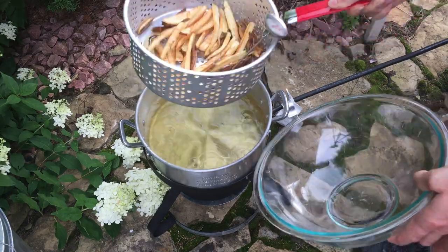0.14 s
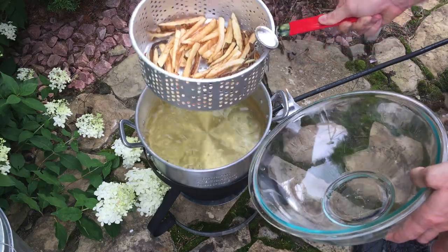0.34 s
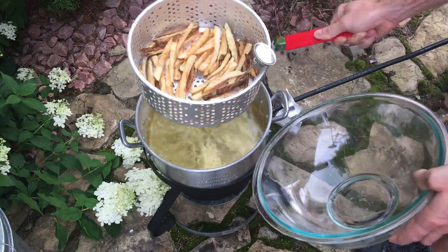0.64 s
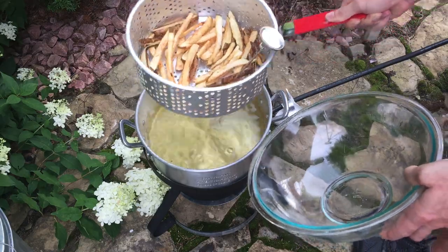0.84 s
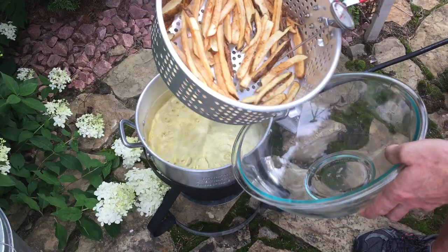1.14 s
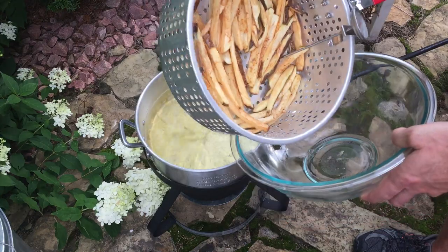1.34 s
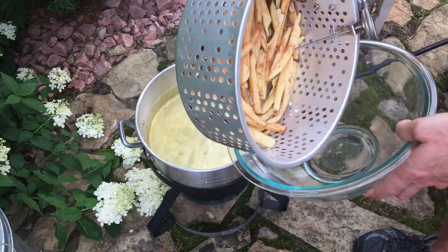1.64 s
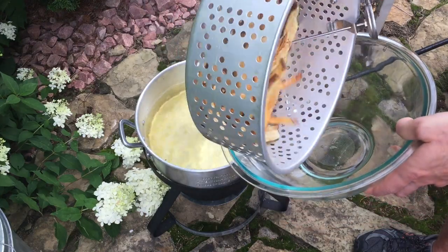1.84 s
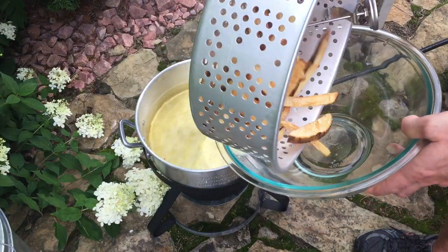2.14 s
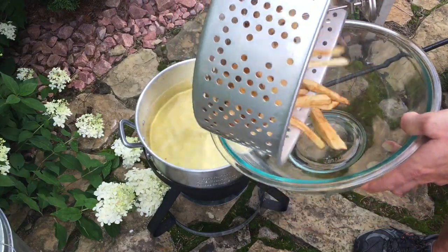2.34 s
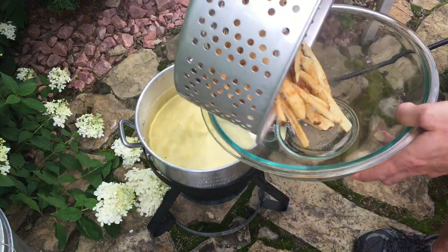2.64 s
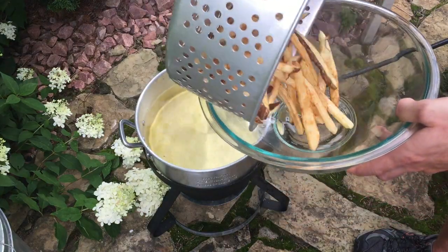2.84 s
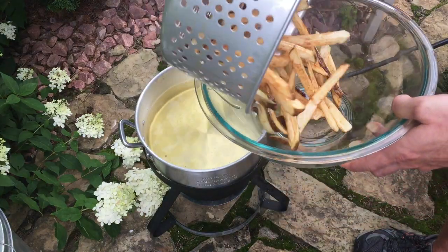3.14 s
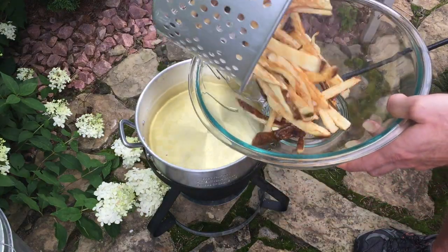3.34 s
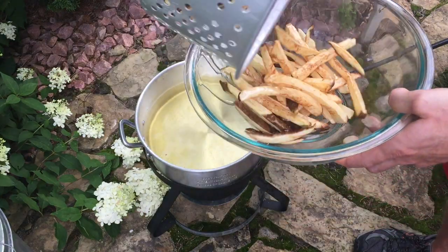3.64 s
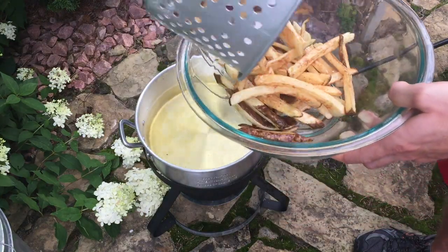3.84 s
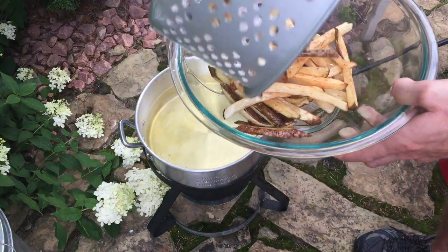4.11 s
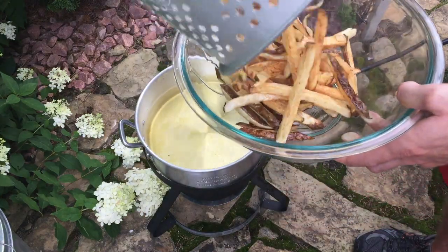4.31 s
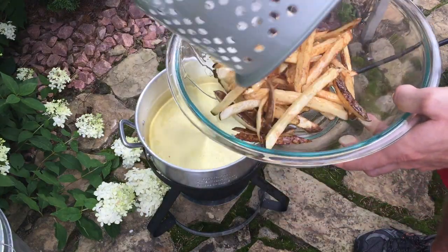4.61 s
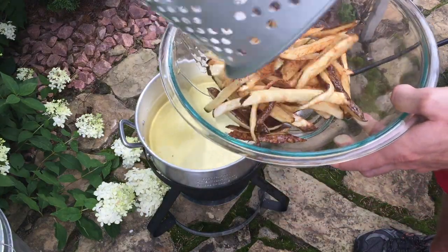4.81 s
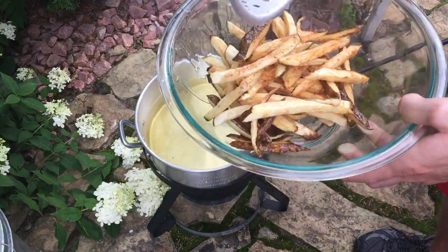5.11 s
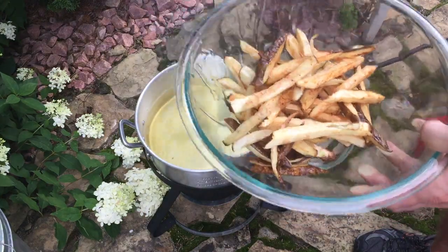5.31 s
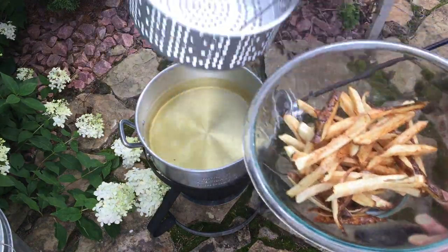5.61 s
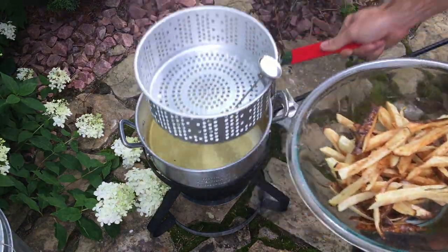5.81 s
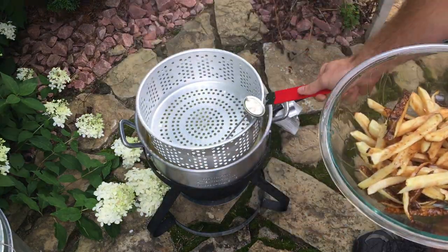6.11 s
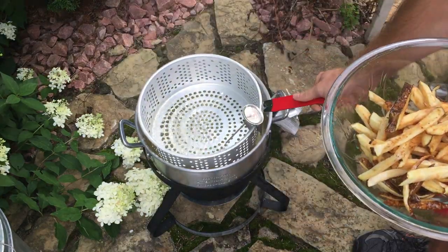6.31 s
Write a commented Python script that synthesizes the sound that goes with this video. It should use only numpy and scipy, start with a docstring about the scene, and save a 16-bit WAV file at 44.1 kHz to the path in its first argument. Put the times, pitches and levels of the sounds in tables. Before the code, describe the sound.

The sounds are close, in a quiet garden with soft air, a low hum and very faint ticks of hot oil. In the first second a metal fryer basket scrapes and bumps lightly and its clip clinks. From about 1.1 to 1.7 seconds the basket knocks repeatedly on a glass bowl, which rings; these are the loudest sounds. Softer knocks follow between 2.2 and 2.5 seconds. From about 1.4 to 4.7 seconds crisp fries rustle over the metal and tumble into the bowl in surges, with dull taps, soft thumps and small clinks. A distant bird whistles faintly near 0.6, 4.4 and 4.9 seconds. A far dog yaps faintly near 1.5 seconds and more clearly at 5.3. At 5.9 seconds the empty basket lands in its pot with a ringing clank, followed by light scrapes and bumps. Everything is heard on the left side only.

```python
"""In a garden, close to the microphone, hot oil ticks and a thermometer clip rattles on an aluminium basket.
A bird whistles far off. From about 1 s the basket knocks on a hand-held glass bowl, which rings, and crisp
fries rustle over the perforated wall and tumble in. A distant dog yaps as they pour and again afterwards.
Near 6 s the empty basket clanks back into its pot. Only the left channel carries sound."""
import sys
import numpy as np
from scipy import signal
from scipy.fft import rfft, irfft, next_fast_len
from scipy.io import wavfile
from scipy.ndimage import uniform_filter1d

SR = 44100
rng = np.random.default_rng(int(sys.argv[2]) if len(sys.argv) > 2 else 0)


def put_to_file(sound):
    """Save the sound as 16-bit audio at rate SR, in the file named by the first command-line argument."""
    columns = np.atleast_2d(sound).T  # one column per channel
    safe = np.clip(columns, -1, 1)
    whole_steps = np.round(safe * 32767)
    wavfile.write(sys.argv[1], SR, whole_steps.astype(np.int16))


N = 285131

# spectrum of the garden air: freq_hz, level_db
AIR_SPECTRUM = [(15, -78), (25, -26), (59, 5.5), (113, -9), (221, -8), (260, -8), (322, -11), (614, -13),
                (762, -12), (1410, -10.5), (2700, -22), (3530, -23.5), (3830, -25.5), (10600, -29.5),
                (15500, -30)]
# noise bands of a distant machine: centre_hz, width_hz, level_db
HUM_BANDS = [(74.4, 7.6, -71), (115.6, 9.1, -67), (601, 96, -69), (1410, 190, -78), (6940, 1200, -78)]
# thermometer clip rattling on the basket: start_s, level_db, centre_hz
CLINKS = [(0.028, -55.5, 2630), (0.1684, -35, 4070), (1.672, -51, 2440), (1.7752, -40, 2280),
          (1.9943, -27, 4360), (3.6903, -43.5, 4460), (3.981, -41.5, 2770), (4.384, -55.5, 2060),
          (4.4986, -45.5, 4970), (4.524, -53.5, 2270), (4.6445, -53, 2060), (4.752, -55, 2050),
          (6.233, -57.5, 5550)]
CLIP_MODES = [(1895, 19, 0.14), (2000, 20.5, 0.075), (2390, -24, 0.08), (2330, -8, 0.098),
              (2800, -18, 0.066), (3380, 18, 0.073), (3400, -1, 0.045), (3816, -16, 0.036),
              (4100, -16, 0.035), (4500, -5, 0.027), (5100, -37, .08), (5730, 25, 0.015)]
# the loudest fries landing on metal and glass: start_s, level_db, tilt_db_per_octave
FRY_TAPS = [(0.078, -48, -2.5), (.134, -47.5, -0.5), (.386, -42, -2), (1.849, -37, -2.5),
            (1.993, -30, -0.5), (2.1065, -33, 0), (2.2853, -42, 1), (2.7254, -40.5, -12.5),
            (2.7613, -36, 0.5), (3.386, -40.5, 0), (3.4225, -44.5, -1), (3.8319, -41, -1.5),
            (3.983, -46, 1), (4.0612, -37.5, 0), (4.151, -40, 2), (4.524, -46.5, -3.5)]
# spectrum of a fry's tap: freq_hz, level_db
TAP_SPECTRUM = [(60, -5), (250, -4.5), (550, 7.5), (800, 8.5), (1100, 11.5), (1600, 7.5), (3200, 5.5),
                (5000, 4), (8000, 1), (15500, -7.5)]
# scrapes of the basket and its handle: start_s, length_s, level_db, tilt_db_per_octave
SCRAPES = [(0.084, 0.13, -58, 4), (0.257, 0.11, -63.5, -1), (0.334, 0.082, -46, -3),
           (0.386, 0.5, -66.5, -7), (6.037, 0.1, -50, 6), (6.187, 0.14, -61, 1.5)]
# soft bumps of the held basket, bowl and falling pile: start_s, level_db
BUMPS = [(0.265, -44), (0.366, -49), (2.293, -45), (2.409, -43), (2.724, -62), (3.63, -48.5), (3.97, -49.5),
         (4.055, -41), (6.108, -47), (6.398, -47.5)]
# a far bird: start_s, length_s, pitch_hz, level_db
WHISTLES = [(0.598, 0.28, 3420, -71), (4.42, 0.18, 3460, -64.5), (4.92, 0.28, 3600, -73.5)]
# basket on the bowl's rim: start_s, ring_db, clatter_db, pressure (0-1), tilt_db_per_octave
RIM_STRIKES = [(1.1395, -16.5, -19, 0.17, -2.5), (1.160, -37.5, -32, 0.1, -8.5),
               (1.2, -27, -40.5, 0.05, -0.5), (1.3828, -22, -24, 0.9, -2), (1.4558, -22, -33.5, 0.97, -3.5),
               (1.498, -36, -40.5, 0.56, -2), (1.599, -20, -26, 0.99, -4), (1.62, -52, -49, 1, -1),
               (1.7256, -40.5, -39, 1, -3.5), (2.1827, -28, -28, 0.86, -2.5),
               (2.2277, -32.5, -31, 0.67, -0.5), (2.3323, -28.5, -27, 0.87, -2),
               (2.3737, -31.5, -32.5, 0.74, -2.5), (2.4649, -55, -34.5, 0.9, -9),
               (2.474, -39.5, -41.5, 0.45, -1)]
# modes of the glass bowl: pitch_hz, rise_hz (under full pressure), level_db, t60_s
BOWL_MODES = [(381, 68, -16, 0.14), (1027.7, 75.5, -3, 0.48), (1920, 8, 0, 0.17), (3003, -1.5, -3.5, 0.081),
              (2980, 15, -8, 0.24), (2700, -13, -36, 0.119), (4300, -4, -23, 0.2), (4110, 18, -24, 0.3),
              (4600, -13, -15, 0.14), (5590, 40, -9, 0.14), (5950, -14, -16, 0.24), (8740, -5, -16, 0.08),
              (9550, -2, -23, 0.1), (9530, 3, -14, 0.11)]
# clatter of the loaded basket: freq_hz, level_db
BASKET_SPECTRUM = [(60, -20), (200, -6.5), (290, -11.5), (420, -1), (650, 4), (900, -4), (1250, 3),
                   (1700, -2), (2500, -6), (4400, -5), (7000, -12), (10000, -14), (15500, -25)]
# decay of that clatter: freq_hz, t60_s
BASKET_DECAY = [(200, 0.052), (1200, .1), (4000, 0.11), (14000, 0.14)]
# how strongly the pile flows out of the basket: time_s, level_db
FLOW = [(1.301, -66), (1.42, -51.5), (1.65, -52), (2.079, -53), (2.42, -46.5), (2.53, -47.5),
        (2.612, -54.5), (2.76, -46.5), (2.87, -55.5), (3.0, -53), (3.1, -49), (3.4, -49.5), (3.5, -57),
        (3.68, -53.5), (3.78, -49), (4.14, -50), (4.42, -64.5), (4.85, -74)]
# clumps of fries that break loose and slip: middle_s, length_s, level_db
SLIPS = [(1.925, 0.17, -47.5), (2.692, 0.1, -47), (2.809, 0.042, -43.5), (2.94, 0.043, -55),
         (3.203, 0.02, -48), (3.615, 0.076, -48), (3.904, 0.05, -44.5), (4.055, 0.24, -49),
         (4.284, 0.1, -46), (4.547, 0.089, -57.5), (4.655, 0.054, -60.5)]
# crisp rustle of the crusts: freq_hz, level_db
RUSTLE_SPECTRUM = [(880, -59), (1500, -5), (2490, -4), (2800, 0), (3650, -2), (5670, -3.5), (7670, -8.5),
                   (9600, -8), (14600, -18), (15500, -20)]
# soft tumbling of the pile: freq_hz, level_db
TUMBLE_SPECTRUM = [(120, -62), (200, -8), (365, -2), (424, -1), (597, 6.5), (744, -1.5), (1130, 4.5),
                   (1280, -3.5), (2200, -4), (2860, -6), (4840, -120)]
# a far dog: start_s, length_s, top_pitch_hz, level_db
YAPS = [(1.54, .085, 487, -54), (5.274, 0.028, 494, -45.5), (5.298, 0.082, 485.3, -41.5)]
# harmonics of a yap, from the fundamental up: level_db
YAP_HARMONICS_DB = [-10, 8.5, -6.5, -22]
# empty basket landing in the pot: start_s, ring_db, clatter_db
LANDING = (5.8819, -36.5, -28.5)
# modes of basket and pot together: pitch_hz, level_db, t60_s
POT_MODES = [(316, -1.5, 0.52), (422, -27, 0.42), (614, -3, 0.17), (930, 4.5, 0.25), (1056, 2, 0.26),
             (1160, 0, 0.31), (1430, -18, .23), (1680, -1.5, 0.28), (1790, 0.5, 0.28), (1980, -4, 0.29),
             (2820, -3, 0.22), (3240, -10, .18), (3460, -7.5, 0.19), (4700, -6, 0.16), (5330, 13, 0.02),
             (6040, -6, .12)]
# clatter of their crowded modes: freq_hz, level_db
POT_SPECTRUM = [(60, -22), (200, -5), (320, -10), (450, -9.5), (700, -12.5), (1000, -0.5), (1800, -6),
                (3000, -12.5), (5500, -17), (8000, -18.5), (15500, -32)]
# decay of that clatter: freq_hz, t60_s
POT_DECAY = [(200, 0.46), (1200, 0.22), (4000, 0.19), (14000, 0.15)]
# decay of the garden's echo: freq_hz, t60_s
GARDEN_DECAY = [(200, 0.68), (1000, 0.44), (4000, 0.44), (14000, 0.054)]


def amp(db):
    """Decibels as an amplitude factor."""
    return 10 ** (np.asarray(db) / 20)


def unit(x):
    """Scale to an RMS of 1."""
    return x / np.sqrt(np.mean(x ** 2) + 1e-20)


def read(points, hz):
    """Join rows of (freq_hz, value) by lines on a log frequency axis."""
    freq_hz, value = np.transpose(points)
    return np.interp(np.log(hz + 1), np.log(freq_hz + 1), value)


def add(mix, start_s, sound):
    """Mix a sound in from start_s on."""
    part = mix[max(round(start_s * SR), 0):][:len(sound)]
    part += sound[:len(part)]


def colour(x, spectrum, tilt_db=0):
    """Minimum-phase filter of unit energy with the given spectrum, tilted by tilt_db per octave."""
    hz = abs(np.fft.fftfreq(2048, 1 / SR))
    log_gain = np.log(amp(read(spectrum, hz) + tilt_db * np.log2(np.maximum(hz, 250))))
    taps = np.fft.ifft(np.exp(signal.hilbert(log_gain).conj())).real[:len(hz) // 2]
    return signal.fftconvolve(x, taps / np.linalg.norm(taps))[:len(x)]


def band(centre_hz, width_hz):
    """Steady noise in one narrow band."""
    size = next_fast_len(N, True)
    hz = np.fft.rfftfreq(size, 1 / SR)
    bell = np.exp(-2 * ((hz - centre_hz) / width_hz) ** 2)
    return unit(irfft(rfft(rng.standard_normal(size)) * bell, size)[:N])


def drift(per_s):
    """Slow random wander with an RMS of 1."""
    knots = rng.uniform(-1, 1, N // 50)
    return unit(np.interp(np.arange(N) / SR * per_s, np.arange(len(knots)), knots))


def ring(hz, db, t60_s, rise_s):
    """Damped modes that start from rest and build up during the contact."""
    t = np.arange(SR // 2) / SR
    decay = np.exp(-np.log(1000) * t / t60_s[:, None])
    modes = amp(db)[:, None] * decay * np.sin(2 * np.pi * hz[:, None] * t)
    return modes.sum(0) * (1 - np.exp(-t / rise_s))


def dying_noise(decay):
    """Half a second of crowded modes, each band dying at its own speed."""
    hz, t, bands = signal.stft(rng.standard_normal(SR // 2), SR, nperseg=128)
    return signal.istft(bands * 1000. ** (-t / read(decay, hz)[:, None]), SR, nperseg=128)[1]


def early_reflections(x):
    """Close echoes: the bowl's far wall, then the paving below."""
    out = x.copy()
    for delay_s, db in [(0.0022, -54.5), (0.0082, -20), (0.0108, -22)]:
        add(out, delay_s, amp(db) * x)
    return out


def impact(decay, spectrum, click, tilt_db=0, chatter=0, chatter_s=0.0015):
    """A contact click, brief chatter if asked for, then the crowded ring of the thing struck."""
    x = dying_noise(decay)
    x *= 1 + chatter * np.exp(-np.arange(len(x)) / SR / chatter_s)
    x[0] = click
    return colour(early_reflections(x), spectrum, tilt_db)


def grains(per_s, spread_db, clump_db):
    """Tiny fractures of crust: clicks, in clumps, over a smooth rub."""
    size = amp(spread_db * np.minimum(rng.exponential(1, N), 4.5)) * rng.choice([-1, 1], N)
    clicks = unit(size * (rng.random(N) < per_s / SR))
    return unit((clicks + rng.standard_normal(N)) * amp(clump_db * drift(per_s=90)))


def shifting_colour(x, depth_db, width_bins):
    """Each fry that rubs has resonances of its own: patches of colour come and go."""
    bands = signal.stft(x, SR, nperseg=512)[2]
    across_pitch = uniform_filter1d(rng.standard_normal(bands.shape), width_bins, axis=0)
    patches = unit(uniform_filter1d(across_pitch, 9, axis=1))
    return unit(signal.istft(bands * amp(depth_db * np.tanh(patches)), SR, nperseg=512)[1][:N])


def voice(hz, harmonics_db, waver):
    """An animal's call: a slightly unsteady pitch with its harmonics."""
    turns = np.cumsum(hz * (1 + waver * drift(per_s=250)[:len(hz)])) / SR
    return unit(sum(amp(db) * np.sin(2 * np.pi * k * turns) for k, db in enumerate(harmonics_db, 1)))


def ambience(fade_db_per_s=0.45, hiss_start_s=4.8):
    """Garden air, low rumble, a far machine and a faint insect; a thin high hiss sets in late."""
    t = np.arange(N) / SR
    air = amp(-61) * unit(colour(rng.standard_normal(N), AIR_SPECTRUM))
    rumble = band(141.5, 58) * amp(-66 + 2 * drift(per_s=17))
    hum = sum(amp(db) * band(hz, width_hz) for hz, width_hz, db in HUM_BANDS)
    insect = band(9500, 500) * amp(-88 + 4 * drift(per_s=16))
    hiss = band(15200, 1300) * amp(-69) * np.clip(t - hiss_start_s, 0, 1)
    return (air + hum) * amp(-fade_db_per_s * t) + rumble + insect + hiss


def oil_ticks(per_s=42, spread_db=0.5):
    """Tiny bright pops of the hot oil in the pot."""
    size = amp(spread_db * np.minimum(rng.exponential(1, N), 4))
    pops = size * (rng.random(N) < per_s / SR)
    return amp(-81.5) * unit(colour(pops, TAP_SPECTRUM, tilt_db=10))


def clip_clinks(ring_db=-17.5, octave_loss_db=60):
    """The loose clip clicks and rings in the modes near the pitch that each contact favours."""
    out = np.zeros(N)
    hz, mode_db, t60_s = np.transpose(CLIP_MODES)
    for start_s, level_db, centre_hz in CLINKS:
        loss_db = octave_loss_db * np.log2(hz / centre_hz) ** 2
        add(out, start_s, ring(hz, level_db + ring_db + mode_db - loss_db, t60_s, rise_s=0.00022))
        grit_hz = centre_hz * np.array([0.25, 0.47, 1.03, 1.28, 1.57, 7.5])
        grit = list(zip(grit_hz, [-30, -15, 0, 0, -14, -25]))
        add(out, start_s, amp(level_db) * impact([(1000, 0.13), (8000, 0.04)], grit, click=1.2))
    return out


def fry_taps():
    """Single fries land with a dull, short tap."""
    out = np.zeros(N)
    for start_s, level_db, tilt_db in FRY_TAPS:
        tap = impact([(300, 0.088), (8000, 0.072)], TAP_SPECTRUM, click=7.7, tilt_db=tilt_db)
        add(out, start_s, amp(level_db) * tap)
    return out


def basket_scrapes():
    """The basket and its handle give short gritty rubs that swell and fade."""
    out = np.zeros(N)
    grit = shifting_colour(grains(per_s=1700, spread_db=1.5, clump_db=4.5), depth_db=-5.5, width_bins=8)
    for start_s, length_s, level_db, tilt_db in SCRAPES:
        piece = grit[round(start_s * SR):][:round(length_s * SR)]
        rub = unit(colour(piece, RUSTLE_SPECTRUM, tilt_db))
        add(out, start_s, amp(level_db) * rub * signal.windows.hann(len(rub)))
    return out


def bumps(pitch_hz=151.3, t60_s=0.19):
    """Basket, bowl and pile bump softly in three damped low modes."""
    out = np.zeros(N)
    hz = pitch_hz * np.array([0.8, 1, 1.25])
    for start_s, level_db in BUMPS:
        add(out, start_s, ring(hz, level_db + np.array([-6, 0, -6]), np.full(3, t60_s), rise_s=0.0049))
    return out


def bird_whistles(hold_share=0.62, slur_share=0.3, pitch_drop=0.078, flutter_db=5.5):
    """Each whistle swells on one note, then slurs down and fades; it flutters on its long way here."""
    out = np.zeros(N)
    for start_s, length_s, pitch_hz, level_db in WHISTLES:
        progress = np.linspace(0, 1, round(length_s * SR))
        hz = pitch_hz * (1 - pitch_drop * np.clip((progress - hold_share) / slur_share, 0, 1))
        swell_db = np.interp(progress, [0, hold_share, 1], [-9, 0, -5])
        level = amp(level_db + swell_db + flutter_db * drift(per_s=57)[:len(hz)])
        add(out, start_s, level * signal.windows.tukey(len(hz), 0.1) * voice(hz, [0], waver=0.0095))
    return out


def rim_strikes(choke_per_s=1.62, settle_s=0.034, glass_tilt_db=-1):
    """The basket hits the glass; while it presses on the rim the bowl's modes rise and are choked."""
    out = np.zeros(N)
    hz, rise_hz, mode_db, t60_s = np.transpose(BOWL_MODES)
    for start_s, ring_db, clatter_db, pressure, tilt_db in RIM_STRIKES:
        # each spot on the rim favours other upper modes, and the glass takes up less treble
        spot_db = -5 * np.cos(2 * np.pi * rng.random(len(hz))) * (hz > hz[2])
        levels_db = ring_db + mode_db + spot_db + (tilt_db + glass_tilt_db) * np.log2(hz / hz[1])
        choked_t60_s = 1 / (1 / t60_s + choke_per_s * pressure)
        glass = ring(hz + pressure * rise_hz, levels_db, choked_t60_s, rise_s=0.0014)
        # the basket settles and stops the ring
        settling = np.exp(-pressure * (np.arange(len(glass)) / SR / settle_s) ** 2)
        add(out, start_s, glass * settling)
        clatter = impact(BASKET_DECAY, BASKET_SPECTRUM, click=1.6, tilt_db=tilt_db, chatter=amp(4))
        add(out, start_s, amp(clatter_db) * clatter)
    # bowl and open basket radiate little bass
    return signal.sosfilt(signal.butter(2, 220, "high", fs=SR, output="sos"), out)


def sliding_fries(cushion_db_per_s=1.92):
    """Crusts rustle over the perforated wall while the soft pile tumbles and thumps into the bowl."""
    t = np.arange(N) / SR
    time_s, flow_db = np.transpose(FLOW)
    flow = amp(np.interp(t, time_s, flow_db)) * (t > time_s[0]) * (t < time_s[-1])
    slips = np.zeros(N)
    for middle_s, length_s, level_db in SLIPS:
        add(slips, middle_s - length_s / 2, amp(level_db) * signal.windows.cosine(round(length_s * SR)))
    rustle = colour(grains(per_s=1200, spread_db=0, clump_db=2.5), RUSTLE_SPECTRUM)
    tumble = colour(grains(per_s=340, spread_db=1.5, clump_db=4.5), TUMBLE_SPECTRUM)
    rustle = shifting_colour(rustle, depth_db=4.5, width_bins=4)
    tumble = shifting_colour(tumble, depth_db=4, width_bins=3)
    thump = band(141, 64) * amp(-11.5 + 2.7 * drift(per_s=25))
    rubbing = np.hypot(amp(-1.5) * flow, slips)
    falling = np.hypot(flow, amp(-4.5) * slips)  # a slipping clump rasps more than it tumbles
    cushion = amp(-cushion_db_per_s * (t - time_s[0]))  # softer as fries cover the glass
    return (rustle + crust_crackle()) * rubbing + (tumble + thump) * falling * cushion


def crust_crackle(per_s=64, decay_s=0.003):
    """Single crusts snap in bright bursts a few milliseconds long."""
    t = np.arange(SR // 25) / SR
    snaps = rng.exponential(1, N) * (rng.random(N) < per_s / SR)
    bursts = signal.fftconvolve(snaps, np.exp(-t / decay_s))[:N] * rng.standard_normal(N)
    return amp(-10.5) * unit(colour(bursts, RUSTLE_SPECTRUM, tilt_db=8.5))


def dog_yaps(top_share=0.613, pitch_rise=0.16, pitch_fall=0.25, attack_s=0.015, release_s=0.033):
    """Each far yap swells and dies while its pitch runs through one arch."""
    out = np.zeros(N)
    for start_s, length_s, top_hz, level_db in YAPS:
        t = np.arange(0, length_s, 1 / SR)
        from_top = np.interp(t / length_s, [0, top_share, 1], [-1, 0, 1])
        hz = top_hz * (1 - np.where(from_top < 0, pitch_rise, pitch_fall) * from_top ** 2)
        envelope = np.minimum(t / attack_s, 1) * np.minimum((length_s - t) / release_s, 1)
        add(out, start_s, amp(level_db) * envelope * voice(hz, YAP_HARMONICS_DB, waver=0.015))
    return out


def basket_landing():
    """The empty basket drops into the pot and both ring."""
    out = np.zeros(N)
    start_s, ring_db, clatter_db = LANDING
    hz, mode_db, t60_s = np.transpose(POT_MODES)
    add(out, start_s, ring(hz, ring_db + mode_db, t60_s, rise_s=0.0015))
    add(out, start_s, amp(clatter_db) * impact(POT_DECAY, POT_SPECTRUM, click=2, chatter=0.53))
    return out


def garden_echo(x):
    """Scattered echoes from paving and walls."""
    tail = dying_noise(GARDEN_DECAY)
    return signal.fftconvolve(x, tail / np.linalg.norm(tail))[:N]


def scene():
    """Cooking close to the microphone, dog and bird far off with more echo; all on the left channel."""
    near = rim_strikes() + basket_landing() + fry_taps() + clip_clinks()
    near = near + sliding_fries() + basket_scrapes() + bumps() + oil_ticks()
    dog, bird = dog_yaps(), bird_whistles()
    echo = garden_echo(amp(-23) * near + amp(-9.5) * dog + amp(-10.5) * bird)
    left = near + dog + bird + echo + ambience()
    return np.array([left, np.zeros(N)])


def record(dry, gain_db=7, low_cut_hz=45, ceiling=1.5, high_cut_hz=15750):
    """Microphone gain, bass roll-off, soft overload and the band limit."""
    x = signal.sosfilt(signal.butter(2, low_cut_hz, "high", fs=SR, output="sos"), amp(gain_db) * dry)
    x = ceiling * np.tanh(x / ceiling)
    lowpass = signal.firwin(401, high_cut_hz, window=("kaiser", 8), fs=SR)
    return signal.oaconvolve(x, lowpass[None], "same")


dry = scene()
out = record(dry)
put_to_file(out)
```